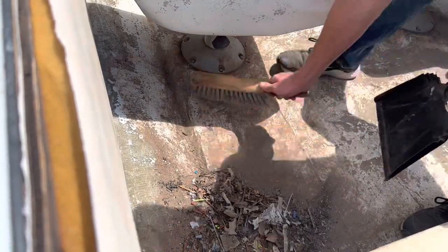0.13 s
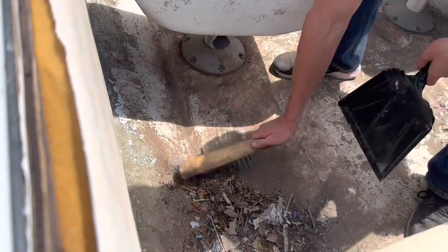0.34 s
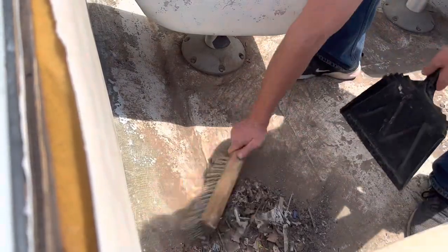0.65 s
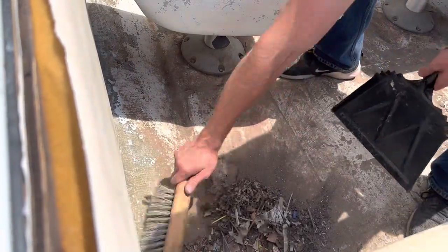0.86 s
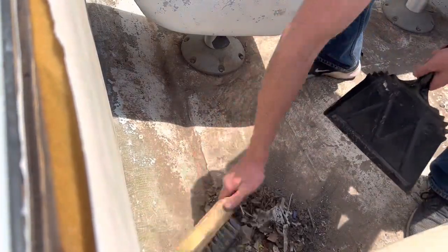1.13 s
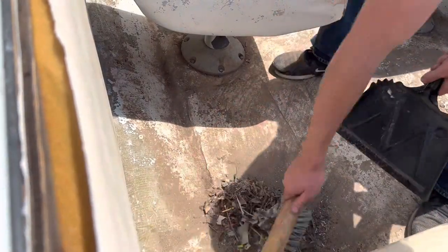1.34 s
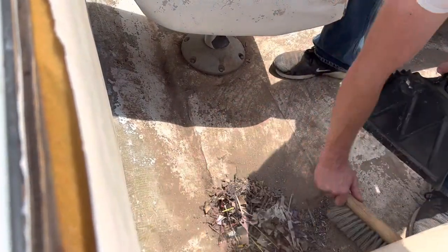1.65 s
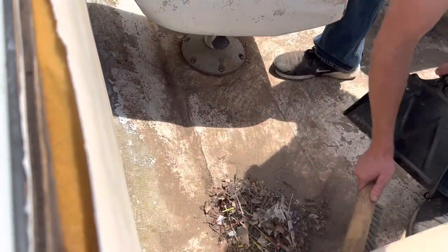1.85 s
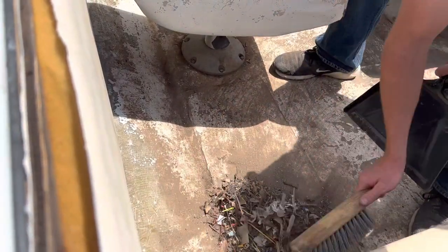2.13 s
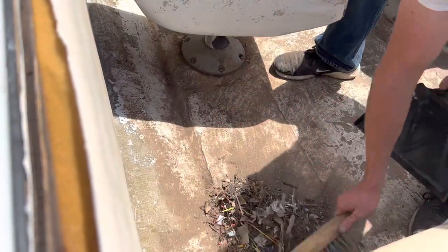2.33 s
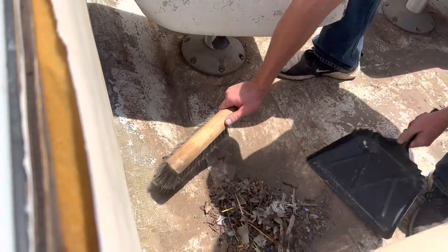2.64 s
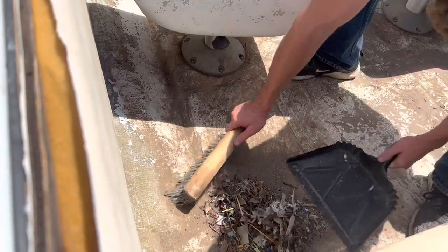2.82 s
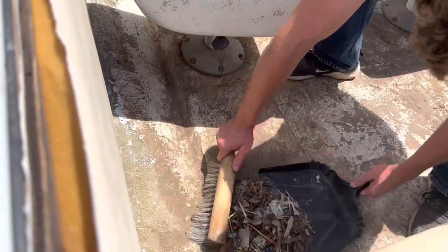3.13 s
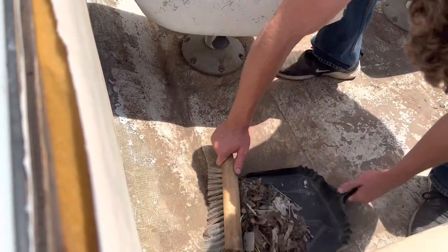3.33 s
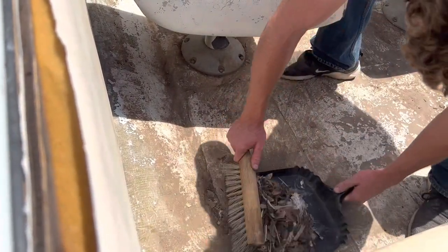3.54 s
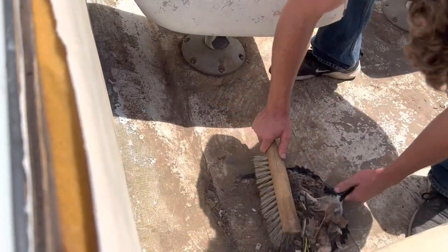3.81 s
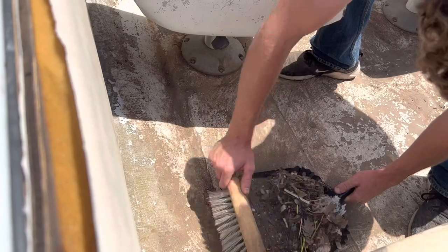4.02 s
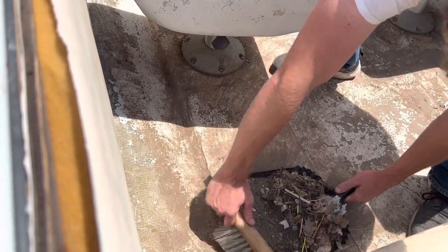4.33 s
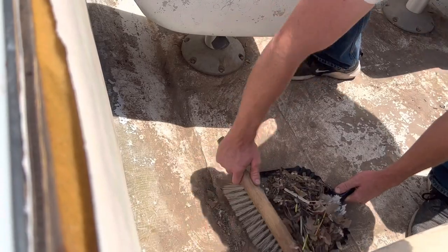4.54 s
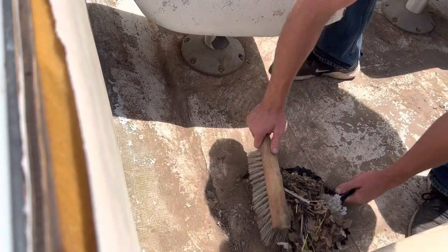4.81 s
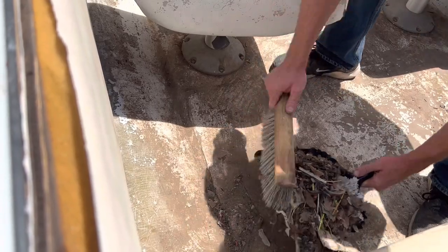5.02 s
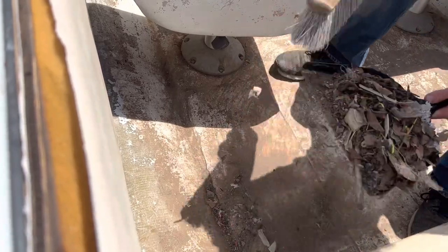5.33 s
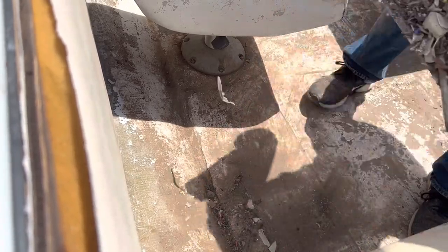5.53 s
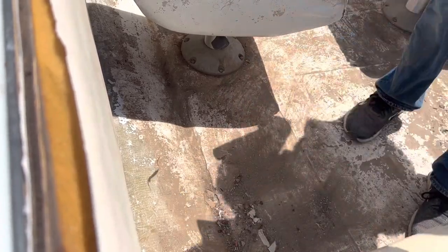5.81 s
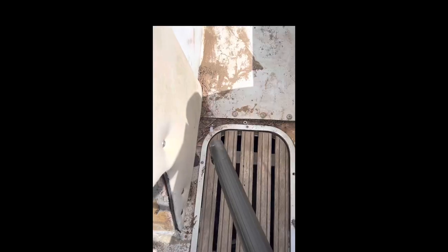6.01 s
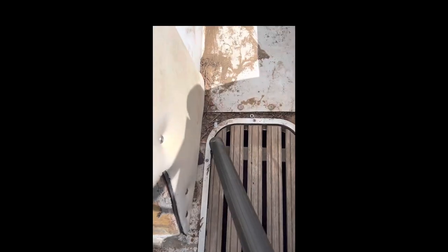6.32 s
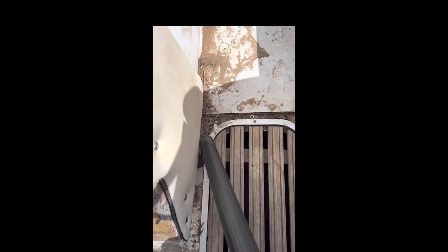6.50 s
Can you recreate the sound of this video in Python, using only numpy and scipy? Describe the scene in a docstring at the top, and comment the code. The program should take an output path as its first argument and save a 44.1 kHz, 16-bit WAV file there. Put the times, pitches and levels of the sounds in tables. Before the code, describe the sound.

Bristles swish over grit, a plastic pan scrapes and rattles with dull knocks and faint birds, then loud vacuum suction cuts in.

```python
"""First a hand brush sweeps grit over a hollow boat deck: slipping bristles hiss, rolling grit scratches, bits tick.
Then it pushes the heap into a plastic dustpan whose lip sticks, slips and rings, with deck knocks and wind gusts;
later small birds whistle far off, the load shifts in the pan, low handling bumps thud, a faint hum swells and
a sole scuffs. After a brief dip to silence a shop vacuum roars through its hose resonances; its nozzle knocks on
the deck and a sharp crack is a swallowed pebble. Noise makes the rubs and air, decaying sines the knocks."""
import sys
import numpy as np
from scipy import signal
from scipy.fft import rfft, irfft, next_fast_len
from scipy.io import wavfile

SR = 44100
rng = np.random.default_rng(int(sys.argv[2]) if len(sys.argv) > 2 else 0)


def dump(signal):
    """Clip the signal to [-1, 1] and save it as 16-bit WAV at the path in sys.argv[1]."""
    limited = np.clip(np.atleast_2d(signal).T, -1, 1)
    pcm = np.round(limited * 32767).astype(np.int16)
    wavfile.write(sys.argv[1], SR, pcm)


N = 293706

# cuts between the three parts (sweeping, dustpan, vacuum): t/s
CUTS_S = (2.572, 6.005)


def amp(db):
    """Decibels to linear gain."""
    return 10 ** (np.asarray(db) / 20)


def rms_one(x):
    """Scale to an rms of 1, over all channels together."""
    return x / np.sqrt(np.mean(x ** 2) + 1e-20)


def gains(rows):
    """Turn level columns into gains over time, silent outside the table."""
    s, *columns = np.transpose(rows)
    t = np.arange(N) / SR
    return [amp(np.interp(t, s, column, left=-150, right=-150)) for column in columns]


def at_hz(points, size):
    """Read a curve at every FFT frequency, along a logarithmic pitch axis."""
    hz, value = np.transpose(points)
    return np.interp(np.log(np.fft.rfftfreq(size, 1 / SR) + 1), np.log(hz), value)


def colour(x, spectrum):
    """Filter a signal by a curve of gains in dB."""
    size = next_fast_len(N)
    return irfft(rfft(x, size) * amp(at_hz(spectrum, size)), size)[..., :N]


def drift(rate_hz):
    """Slow chance of rms 1: noise through two low-pass poles, drawn at every 20th sample."""
    r = np.exp(-40 * np.pi * rate_hz / SR)
    noise = rng.standard_normal(N // 20 + 2002)
    slow = signal.lfilter([1], [1, -2 * r, r * r], noise)[2000:]
    return np.interp(np.arange(N) / 20, np.arange(len(slow)), rms_one(slow))


def grains(per_s, spread_db, smooth):
    """Two draws of tiny slips at shared moments, over smooth noise; rms 1."""
    slips = rng.random(N) < per_s / SR
    sizes = slips * amp(spread_db * np.minimum(rng.exponential(1, N), 4))
    rough = rms_one(sizes * rng.standard_normal((2, N)))
    return rms_one(rough + smooth * rng.standard_normal((2, N)))


def resonate(x, modes):
    """Parallel two-pole resonances of alternating sign; modes hold (f/Hz, width/Hz, level/dB)."""
    out = 0
    for k, (hz, width, db) in enumerate(modes):
        r = np.exp(-np.pi * width / SR)
        top = (-1) ** k * amp(db) * (1 - r * r) / 2
        poles = [1, -2 * r * np.cos(2 * np.pi * hz / SR), r * r]
        out = out + signal.lfilter([top, 0, -top], poles, x)
    return out


def add(out, s, x):
    """Mix x into out from second s on."""
    i = int(s * SR)
    out[..., i:i + x.shape[-1]] += x[..., :N - i]


def echoes(x, t60):
    """A short decaying cloud of reflections, another one for each draw; unit energy."""
    t = np.arange(int(t60 * SR)) / SR
    cloud = rng.standard_normal((2, len(t))) * amp(-60 * t / t60)
    return signal.fftconvolve(x, rms_one(cloud) / np.sqrt(len(t)), axes=1)[:, :N]


# rubs over grit, first brush strokes, later the load shifting in the pan and a sole rubbing:
# (start t/s, length t/s, hiss crest t/s after start, scratch crest t/s after start, hiss level/dB, scratch level/dB)
RUBS = [(-.04, 0.1, 0.065, 0.11, -61, -63), (0.12, 0.36, 0.26, 0.155, -50.5, -50.5),
        (0.533, 0.25, 0.13, 0.03, -50, -67), (0.85, 0.34, 0.12, 0.12, -52.5, -63.5),
        (1.192, 0.27, 0.15, 0.12, -50, -52), (1.533, 0.26, 0.081, 0.06, -67, -55),
        (1.646, 0.22, 0.076, 0.049, -52, -60.5), (1.912, 0.12, 0.048, 0.039, -50, -49.5),
        (1.952, 0.23, 0.11, 0.058, -56.5, -61), (2.26, 0.15, 0.067, 0.067, -55, -58),
        (2.4, 0.13, .07, 0.041, -63.5, -85), (4.642, 0.76, 0.14, 0.14, -60, -66.5),
        (5.175, 0.23, 0.15, 0.39, -62.5, -63.5), (5.344, 0.19, 0.12, 0.13, -60.5, -55),
        (5.549, 0.2, 0.031, 0.11, -54, -54), (5.695, 0.59, 0.15, 0.061, -73, -67.5)]


def arches(crest_column, db_column, power):
    """Speed swells to a crest and ebbs in each rub; loudness grows as a power of it."""
    t, out = np.arange(N) / SR, np.zeros(N)
    for row in RUBS:
        s, length = row[:2]
        crest = np.clip(row[crest_column], .005, length - .005)
        speed = np.sin(np.pi / 2 * np.interp(t, [s, s + crest, s + length], [0, 1, 0]))
        out += amp(row[db_column]) * speed ** power
    return out


def patchy(x, depth_db, rate_hz):
    """Patchy scratch: nine broad bands swell and fade by chance, each on its own."""
    bands = 0
    for k, hz in enumerate(np.geomspace(350, 14000, 9)):
        band = resonate(x, [(hz, .45 * hz, 0)])
        bands = bands + (-1) ** k * band * amp(depth_db * drift(rate_hz))
    return rms_one(bands)


# the brush pushes the heap into the pan: (t/s, bristle hiss level/dB, plastic rattle level/dB)
PUSH = [(2.61, -88, -65), (2.64, -44, -52), (2.69, -38, -35.5), (2.72, -41, -38), (2.73, -38, -38),
        (3.07, -38, -34), (3.17, -40, -39.5), (3.19, -41, -33.5), (3.35, -49, -51), (3.5, -45, -57.5),
        (3.59, -42.5, -41), (3.79, -51.5, -63), (3.84, -59, -77), (4.13, -71.5, -90), (4.15, -68, -67),
        (4.28, -59.5, -75), (4.31, -51.5, -67), (4.45, -46, -52.5), (4.47, -45, -36.5), (4.51, -45, -60),
        (4.56, -47.5, -45), (4.63, -49.5, -67), (4.64, -47, -76), (4.74, -66, -74)]
# resonances of the plastic pan: (f/Hz, width/Hz, level/dB)
PAN_MODES = [(708, 28, -5), (985, 110, -7), (1164, 40, -11), (1435, 22, -6), (1499, 18, -6), (1619, 28, -6),
             (1734, 40, -9), (2456, 55, -13), (2638, 40, -13), (3087, 40, -13), (3780, 60, -16),
             (4011, 20, -15)]
# spectra of bristle hiss, swept grit, grit in the pan, and grit trickling between strokes: (f/Hz, level/dB)
BRISTLE_SPECTRUM = [(2000, -3.5), (4000, -2), (7000, -1), (10000, 0), (13000, 2), (16000, -1)]
GRIT_SPECTRUM = [(300, -9), (700, 8), (1500, 4), (3000, 3.5), (5000, -1), (8000, -6.5), (11000, -14),
                 (16000, -41)]
PAN_GRIT_SPECTRUM = [(500, -15), (1000, 10), (2000, 0), (3000, 0.5), (5000, -14), (8000, -65), (11000, -6),
                     (16000, -46)]
TRICKLE_SPECTRUM = [(400, 2.5), (1500, 3), (3200, -5.5), (4800, -10.5), (7000, -2.5), (9000, -7.5),
                    (10500, -22), (16000, -25)]
TRICKLE_DB, LOAD_DB = -62.5, -2
HISS_SHARE = 0.58   # places the level of the load between hiss and rattle


def brush():
    """Bristle tips slip in a fine hiss; rolled grit scratches in coarser grains and rings the pan once inside."""
    pushing, rattle = gains(PUSH)
    hiss = arches(crest_column=2, db_column=4, power=2.9) + pushing
    scratch = arches(crest_column=3, db_column=5, power=4.6)
    first_part = np.arange(N) < CUTS_S[0] * SR
    trickle = amp(TRICKLE_DB + 2.0 * drift(4.7)) * first_part
    load = amp(LOAD_DB) * pushing ** HISS_SHARE * rattle ** (1 - HISS_SHARE)

    slips = grains(9000., spread_db=4, smooth=2.1)
    tips = rms_one(colour(slips, BRISTLE_SPECTRUM)) * amp(1.75 * drift(30.0))
    rolling = grains(3000., spread_db=2.5, smooth=0.92)
    rolling = patchy(rolling, depth_db=2, rate_hz=18.0) * amp(1.95 * drift(45.0))
    level_modes = [(hz, width, 0) for hz, width, db in PAN_MODES]
    ringing = rolling + amp(-4.5) * resonate(rolling, level_modes)
    return (hiss * tips
            + scratch * rms_one(colour(rolling, GRIT_SPECTRUM))
            + trickle * rms_one(colour(rolling, TRICKLE_SPECTRUM))
            + load * rms_one(colour(ringing, PAN_GRIT_SPECTRUM)))


# the chattering lip once pressed down, and the lip before that: (f/Hz, width/Hz, level/dB)
LIP_MODES = [(845, 11, 0), (905, 16, -4)]
LIP_RESTING = [(1165, 18, 0)]
PRESSED_S = 2.69
LOCKED_SHARE = 0.55   # how far the slips lock on to the lip's ringing


def lip_squeal(jolts):
    """Slips lock on to the pressed lip's pitches as unsteady tones, mixed with looser ringing."""
    locked = 0
    for hz, width, db in LIP_MODES:
        turns = np.cumsum(hz * (1 + .007 * drift(20.))) / SR
        tone = np.sin(2 * np.pi * turns) + amp(-16) * np.sin(4 * np.pi * turns)
        locked = locked + amp(db + 2.0 * drift(20.0)) * tone
    loose = sum(resonate(jolts, [mode]) * amp(1.8 * drift(16.0)) for mode in LIP_MODES)
    direct_diffuse = [[1], [.3]]
    pressed = (LOCKED_SHARE * rms_one(locked) * direct_diffuse
               + np.sqrt(1 - LOCKED_SHARE ** 2) * rms_one(loose))
    resting = amp(-5) * rms_one(resonate(rng.standard_normal((2, N)), LIP_RESTING))
    return np.where(np.arange(N) > PRESSED_S * SR, pressed, resting)


# the lip dragged along the deck:
# (t/s, body drone level/dB, lip squeal level/dB, deck hum level/dB, deck drumming level/dB)
SCRAPE = [(2.605, -54, -43, -49, -40), (2.651, -33, -32, -47, -28), (2.675, -45, -42, -61, -48),
          (2.703, -33, -30.5, -33, -41), (2.753, -47, -39, -56, -32), (2.777, -37, -32, -43, -27),
          (2.897, -53, -31.5, -30, -37), (2.933, -54, -30.5, -39, -38), (3.021, -67, -38.5, -27.5, -44),
          (3.219, -54, -54, -36.5, -50.5), (3.249, -41, -48, -40, -36.5), (3.321, -58, -57, -51, -47),
          (3.45, -65, -71, -44.5, -59)]
# resonances of the pan's body and of the deck below: (f/Hz, width/Hz, level/dB)
PAN_BODY = [(258, 210, 0), (438, 98, 6.5), (523, 135, -6.5)]
DECK_MODE = [(115.8, 5.8, 0)]
DRONE_DB, SQUEAL_DB = -15, -16   # extra drone and squeal, relative to the rattle


def dustpan():
    """The lip sticks and slips on the deck; the jolts ring the plastic and the deck below."""
    rattle = gains(PUSH)[1]
    drone, squeal, hum = gains(SCRAPE)[:3]
    jolts = grains(1100.0, spread_db=2.5, smooth=0.93) * amp(0.55 * drift(41.0))
    # each mode's level wanders by chance, on its own
    plastic = sum(resonate(jolts, [mode]) * amp(3.7 * drift(16.0)) for mode in PAN_MODES)
    return (rattle * rms_one(plastic)
            + (drone + amp(DRONE_DB) * rattle) * rms_one(resonate(jolts, PAN_BODY))
            + (squeal + amp(SQUEAL_DB) * rattle) * lip_squeal(jolts)
            + hum * rms_one(resonate(jolts, DECK_MODE)))


# vacuum air: (t/s, hose roar level/dB, nozzle hiss level/dB, low rumble level/dB)
SUCTION = [(6.005, -44.5, -53, -52), (6.079, -42.5, -46.5, -46.5), (6.199, -40, -51, -58),
           (6.255, -39, -60, -44.5), (6.42, -41, -46.5, -53.5), (6.54, -40, -47.5, -60),
           (6.66, -37, -40.5, -58)]
# hose resonances: (f/Hz, width/Hz, level/dB); the roar takes a third of the level, the hiss none of it
HOSE_MODES = [(462, 44, 6), (578, 97, 3), (785, 39, 26), (900, 90, -11), (1180, 130, -11), (1580, 100, -2),
              (1990, 50, -13), (2110, 59, -4), (2690, 260, -17), (3000, 84, -2), (3560, 610, -8),
              (4690, 58, -24), (5800, 140, -25), (7900, 19, -25)]
# fan whine: (f/Hz, rms level/dB before it wavers)
FAN_WHINE = [(991, -55), (1982, -61)]
# spectra of roar, nozzle hiss and low rumble: (f/Hz, level/dB)
ROAR_SPECTRUM = [(200, -27), (400, -2.5), (600, -2), (720, -2), (1000, -2.5), (2000, -2.5), (3500, -12.5),
                 (6000, -7)]
NOZZLE_SPECTRUM = [(1500, -18), (3500, 0.5), (4800, -6), (6000, -1.5), (8500, 7.5), (10500, 5), (13000, 10),
                   (16000, -6)]
RUMBLE_SPECTRUM = [(50, -33), (85, -2.5), (130, 2), (250, -0.5), (380, -1), (600, -20), (2000, -60)]


def vacuum():
    """Turbulent air roars in the hose resonances and hisses at the nozzle; the fan whines faintly."""
    roar, hiss, low = gains(SUCTION)
    air = grains(6800.0, spread_db=3.5, smooth=2.6)
    hose = sum(resonate(air, [(hz, width, db / 3)]) * amp(3.5 * drift(9.4)) for hz, width, db in HOSE_MODES)
    piped = rms_one(air + amp(4.0) * hose)
    hissing = rng.standard_normal((2, N))
    level_modes = [(hz, width, 0) for hz, width, db in HOSE_MODES]
    nozzle = rms_one(hissing + amp(13.0) * resonate(hissing, level_modes))

    turns = np.cumsum(1 + .0006 * drift(6.)) / SR   # the pitch wanders slightly
    whine = sum(np.sqrt(2) * amp(db) * np.sin(2 * np.pi * hz * turns) for hz, db in FAN_WHINE)
    whine = whine * amp(1.8 * drift(17.0)) * (np.arange(N) > CUTS_S[1] * SR)
    direct_diffuse = [[1], [.3]]
    return (roar * rms_one(colour(piped, ROAR_SPECTRUM)) * amp(0.51 * drift(32.0))
            + hiss * rms_one(colour(nozzle, NOZZLE_SPECTRUM)) * amp(0.37 * drift(6.2))
            + whine * direct_diffuse
            + low * rms_one(colour(hissing, RUMBLE_SPECTRUM)))


# knocks on the hollow deck, and low handling bumps around 5 s: (t/s, level/dB, base f/Hz, base t60/s)
KNOCKS = [(0.131, -21.5, 207, 0.11), (0.291, -23, 112.5, 0.41), (0.55, -22, 220, 0.048),
          (0.579, -22, 240, 0.041), (0.857, -29.5, 216, 0.096), (1.617, -23, 442, 0.13),
          (1.621, 0.5, 196.6, 0.085), (2.256, -32, 212, 0.12), (2.58, -6.5, 495, 0.037),
          (2.692, -13.5, 757, 0.042), (2.698, -15, 273, 0.19), (2.777, -18.5, 890, 0.1),
          (2.827, -22, 445, 0.12), (3.191, -14, 126, 0.095), (3.24, -20.5, 266, 0.062),
          (3.329, -22.5, 72.7, 0.34), (3.791, -27, 78.6, 0.084), (3.835, -16, 83, 0.053),
          (4.465, -28.5, 950, 0.059), (4.553, -39, 990, 0.04), (4.789, -17, 70, 0.064),
          (4.861, -16.5, 62.3, 0.17), (4.914, -28, 165, 0.054), (4.988, -50, 1100, 0.05),
          (4.99, -29.5, 190, 0.052), (5.01, -0.5, 61.6, 0.046), (5.043, -22, 170.6, 0.11),
          (5.049, -17, 60.8, 0.31), (5.12, -24, 135, 0.035), (5.183, -24, 88, 0.16),
          (5.204, -23, 130, 0.18), (5.231, -20, 74.3, 0.14), (6.291, -10.5, 576, 0.035),
          (6.294, -18.5, 873, 0.038), (6.296, -18, 215, 0.054), (6.300, -23.5, 122, 0.089),
          (6.372, -32, 300, 0.12), (6.382, -19, 241, 0.051), (6.386, -21, 470, 0.016),
          (6.39, -19.5, 125, 0.054)]
# modes of each knock: (ratio to base f, level/dB, ratio to base t60)
KNOCK_MODES = [(1.007, -1, 0.65), (.8, -15, 1.85), (0.537, -19.5, 1.75), (2.59, -22.5, 0.46),
               (3.34, -26.5, 0.42)]
KNOCK_DIFFUSE = 0.26   # gain of the diffuse part


def knocks():
    """A soft blow swells over a cycle, then the modes die, sagging in pitch; nothing radiates far below."""
    out, t = np.zeros((2, N)), np.arange(int(.4 * SR)) / SR
    quarter_turn = [[0], [np.pi / 2]]   # sets the diffuse part apart from the direct
    for s, db, hz, t60 in KNOCKS:
        swell = np.sin(np.pi / 2 * np.minimum(t * hz / 0.9, 1)) ** 2
        turns = np.cumsum(hz * (1 + 0.22 * np.exp(-t * hz / 1.4))) / SR
        body = 0
        for ratio, level, longer in KNOCK_MODES:
            decay = amp(level - 60 * t / (t60 * longer))
            body = body + decay * np.sin(2 * np.pi * ratio * turns + quarter_turn)
        radiation = signal.butter(2, 0.7 * hz, "high", fs=SR, output="sos")
        add(out, s, amp(db) * signal.sosfilt(radiation, swell * body) * [[1], [KNOCK_DIFFUSE]])
    return out


# bristles, grit, pan edge and pebble tick: (t/s, bright level/dB, dull level/dB relative to bright, t60/s)
TICKS = [(0.038, -48, 11, 0.05), (0.1263, -37, 9, 0.051), (0.173, -41.5, -8, 0.018), (0.219, -52, -3, .015),
         (0.302, -45, 8, 0.023), (0.544, -42.5, 12, 0.047), (0.58, -46, 12, 0.033), (0.856, -40, 11, 0.051),
         (1.19, -44, 11, 0.09), (1.348, -42, 4, .02), (1.423, -43, 2, .015), (1.583, -46.5, 11, 0.035),
         (1.6, -49, 13, 0.064), (1.899, -51, -10, .012), (2.2539, -33.5, 1, 0.093),
         (2.5759, -37.5, 20, 0.055), (2.694, -31, 10, 0.04), (2.7759, -26.5, 7.5, 0.06),
         (2.826, -27, 2, .04), (2.997, -30, 7, 0.045), (3.183, -34, 12, 0.046), (3.234, -30, 12, 0.052),
         (4.111, -57, -6, .012), (4.273, -39.5, 0, 0.021), (4.9874, -58, 11, 0.022),
         (5.024, -43, -3, 0.017), (5.098, -48, -6, 0.011), (5.198, -53.5, 8, 0.03), (5.216, -46, -6, 0.019),
         (5.26, -52, -12, .02), (5.431, -57, 18, .03), (5.802, -54, -8, .02), (6.294, -39, 14, .045),
         (6.385, -43, 11, .05), (6.531, -41, 15, .03), (6.6277, -20, -12, 0.032)]
TICK_RISE_SHARE = 0.065   # rise time as a share of t60


def ticks():
    """Each tick is a bright crack of noise with a duller part."""
    out, t = np.zeros((2, N)), np.arange(int(.12 * SR)) / SR
    bright = signal.butter(2, 2500, "high", fs=SR, output="sos")
    dull = signal.butter(2, [600, 3600], "band", fs=SR, output="sos")
    for s, db, dull_db, t60 in TICKS:
        rise = np.minimum(t / (TICK_RISE_SHARE * t60), 1)
        burst = rng.standard_normal((2, len(t))) * amp(-60 * t / t60) * rise
        crack = signal.sosfilt(bright, burst) + amp(dull_db) * signal.sosfilt(dull, burst)
        add(out, s, amp(db) * crack)
    return out


# a shoe sole turning on grit: (t/s, length t/s, level/dB)
SCUFFS = [(5.554, 0.14, -51.5)]
# its spectrum: (f/Hz, level/dB)
SOLE_SPECTRUM = [(500, -5), (800, 8.5), (1150, -14), (1600, 4), (2300, 5.5), (3200, 1), (4300, -8),
                 (6000, -22), (9000, -30)]


def scuffs():
    """The sole rubs in grains of noise, with a sudden start and a soft end."""
    out = np.zeros((2, N))
    slips = grains(2500.0, spread_db=0.5, smooth=0.81)
    rub = rms_one(colour(slips, SOLE_SPECTRUM)) * amp(2.3 * drift(40.0))
    for s, length, db in SCUFFS:
        progress = np.linspace(0, 1, int(length * SR))
        add(out, s, amp(db) * np.interp(progress, [0, .04, .75, 1], [0.19, 1, 1.0, 0]))
    return out * rub


# wind gusts in the dustpan part: (t/s, level/dB)
GUSTS = [(2.6, -51), (2.8, -54), (3.26, -38), (3.4, -55), (3.64, -42), (3.79, -48.5), (4.18, -49),
         (4.67, -50.5), (4.93, -40), (5.09, -42), (5.27, -43), (5.43, -61), (5.69, -49.5), (6.0, -61.5)]
# wind spectrum: (f/Hz, level/dB)
WIND_SPECTRUM = [(20, -21), (40, -6), (62, 4), (90, -2.5), (140, -11), (300, -88), (900, -103)]
CALM_DB = -66   # before the gusts


def wind():
    """Lumpy air pressure buffets the microphone as low noise."""
    calm = np.arange(N) / SR < GUSTS[0][0]
    level = gains(GUSTS)[0] + amp(CALM_DB) * calm
    noise = rms_one(colour(rng.standard_normal((2, N)), WIND_SPECTRUM))
    return level * amp(3 * drift(25.)) * noise


# spectrum of the hollow deck: (f/Hz, level/dB)
DRUM_SPECTRUM = [(60, -62), (90, -4), (120, 1), (180, -2.5), (260, -6), (400, -18.5), (800, -23.5),
                 (3000, -63)]
DRUM_SWEEP_DB, DRUM_PAN_DB = -47, -59   # in the first and second part


def deck_drumming():
    """The hollow deck drums steadily as low noise, and more strongly under the scraping lip."""
    t = np.arange(N) / SR
    steady = amp(np.where(t < CUTS_S[0], DRUM_SWEEP_DB, DRUM_PAN_DB)) * (t < CUTS_S[1])
    noise = rms_one(colour(rng.standard_normal((2, N)), DRUM_SPECTRUM))
    return (steady + gains(SCRAPE)[3]) * noise


# bird chirps: (t/s, length t/s, start f/Hz, middle f/Hz, end f/Hz, level/dB before the mix)
CHIRPS = [(3.955, .05, 4300, 4330, 4250, -70), (3.985, .025, 4050, 3950, 3850, -66),
          (4.012, .035, 3100, 3600, 3830, -63), (4.04, .09, 3820, 3800, 3740, -67),
          (4.15, .07, 3750, 4120, 3750, -62), (4.222, .04, 3350, 3150, 2950, -61),
          (4.72, .047, 3700, 4000, 4200, -67), (4.79, .045, 3950, 4200, 3600, -62),
          (4.84, .06, 5100, 5110, 5080, -68), (4.858, .04, 4000, 4400, 3850, -61),
          (4.855, .035, 3000, 3250, 3050, -66), (4.908, .058, 3100, 3980, 2750, -59),
          (5.106, .06, 5080, 4950, 4750, -67), (5.125, .03, 4750, 4500, 4200, -67),
          (5.18, .035, 3600, 3950, 3800, -65), (5.356, .065, 4150, 3950, 3620, -63),
          (5.435, .03, 3150, 3450, 3250, -60), (5.62, .04, 4250, 4420, 4200, -65),
          (5.68, .04, 3400, 3800, 3600, -65), (5.70, .06, 4450, 4500, 4400, -68)]
BIRDS_DB, BIRD_ECHO_DB, BIRD_ECHO_T60_S = -1, -2, 0.2


def birds():
    """Short gliding whistles, hoarse and smeared by distance."""
    out = np.zeros(N)
    for s, length, start_hz, middle_hz, end_hz, db in CHIRPS:
        size = int(length * SR)
        glide = np.polyfit([0, .5, 1], [start_hz, middle_hz, end_hz], 2)
        hz = np.polyval(glide, np.linspace(0, 1, size))
        whistle = np.sin(2 * np.pi * np.cumsum(hz) / SR)
        add(out, s, amp(db) * signal.windows.tukey(size, .6) * whistle)
    out = out * (1 + .6 * drift(300.0))   # fast level flutter makes them hoarse
    direct = amp(BIRDS_DB) * out * [[1], [0]]
    return direct + amp(BIRD_ECHO_DB) * echoes(np.array([out, out]), BIRD_ECHO_T60_S)


# spectrum of the far outdoor wash: (f/Hz, level/dB)
OUTDOORS_SPECTRUM = [(60, -38), (200, -5), (400, -7.5), (800, -18.5), (1500, -26), (3000, -30.5),
                     (4200, -28.5), (7000, -51), (10000, -34.5), (16000, -41)]
# a faint far hum: (f/Hz, rms level/dB before it wavers and swells)
FAR_HUM = [(393, -71), (495, -67.5), (651, -73.5), (813, -76)]
# start and end of the hum's swell: t/s
FAR_HUM_SWELL_S = (5.15, 5.19)
OUTDOORS_DB = -61


def outdoors():
    """A slowly swelling wash of noise, joined late by far steady tones; both end as the vacuum starts."""
    t = np.arange(N) / SR
    noise = rms_one(colour(rng.standard_normal((2, N)), OUTDOORS_SPECTRUM))
    wash = amp(OUTDOORS_DB) * amp(1.2 * drift(3.)) * noise
    hum = sum(np.sqrt(2) * amp(db + 2.0 * drift(2.4)) * np.sin(2 * np.pi * hz * t) for hz, db in FAR_HUM)
    hum = hum * np.interp(t, FAR_HUM_SWELL_S, [0, 1]) * [[1], [.5]]
    return (wash + hum) * (t < CUTS_S[1])


LAG_SHARE = 0.46   # how much of the left-right difference is the direct sound, phase-shifted
LAG_PERIOD_S = 0.000203   # sets the pitches at which the leading side turns over


def stereo(pair, likeness):
    """Stereo likeness by pitch: left and right share a direct and a diffuse draw."""
    size = next_fast_len(pair.shape[1] + 4096)
    alike = np.clip(at_hz(likeness, size), -1, 1)
    direct, diffuse = rfft(pair, size)
    hz = np.fft.rfftfreq(size, 1 / SR)
    lag = LAG_SHARE * np.tanh(4 * np.cos(2 * np.pi * hz * LAG_PERIOD_S))
    difference = 1j * lag * direct + np.sqrt(1 - lag ** 2) * diffuse
    difference = difference * np.sqrt((1 - alike) / 2)
    common = direct * np.sqrt((1 + alike) / 2)
    return irfft(np.array([common + difference, common - difference]), size)[:, :pair.shape[1]]


# left-right likeness in each part: (f/Hz, likeness -1..1)
LIKENESS_SWEEP = [(100, 0.98), (250, 0.95), (700, 0.65), (1400, 0.29), (2100, 0.075), (3100, 0.79),
                  (4500, 0.82), (5500, 0.62), (7500, 0.54), (10500, 0.35), (11700, 0.06), (13500, 0.85),
                  (16000, 1)]
LIKENESS_PAN = [(100, 0.92), (230, 0.98), (480, 0.28), (720, 0.24), (950, 1), (1300, 0.6), (2400, 0.9),
                (3900, 0.41), (5500, 0.54), (6100, -0.43), (6700, 0.77), (8500, 0.89), (9150, -1),
                (10750, -1), (11700, 0.25), (12700, 1), (14300, 0.88), (15800, -0.6)]
LIKENESS_VACUUM = [(100, 0.99), (1000, 0.92), (1700, 0.49), (3450, 1), (4800, 0.72), (5500, 0.13),
                   (6900, 0.61), (8300, 0.33), (10000, 0.31), (11200, 0.99), (16000, 1)]
HULL_DB, HULL_T60_S = -9, 0.073
FADE_S = .03


def scene():
    """All sources, heard in three parts in turn; the hull sides reflect what is near."""
    near = brush() + dustpan() + ticks() + scuffs()
    hull = amp(HULL_DB) * echoes(near, HULL_T60_S)
    pair = near + hull + vacuum() + knocks() + wind() + deck_drumming() + birds() + outdoors()
    # fade out and back in around the start of the vacuum
    pair = pair * np.clip(np.abs(np.arange(N) / SR - CUTS_S[1]) / FADE_S, 0, 1)
    parts = np.split(pair, [int(s * SR) for s in CUTS_S], axis=1)
    curves = (LIKENESS_SWEEP, LIKENESS_PAN, LIKENESS_VACUUM)
    return np.hstack([stereo(part, likeness) for part, likeness in zip(parts, curves)])


def record(dry):
    """The microphone drops the deepest bass; the top is cut steeply."""
    bass_cut = signal.butter(2, 32., "high", fs=SR, output="sos")
    top_cut = signal.ellip(12, .5, 80, 15780, fs=SR, output="sos")
    return signal.sosfilt(top_cut, signal.sosfilt(bass_cut, dry))


dry = scene()
out = record(dry)
dump(out)
```